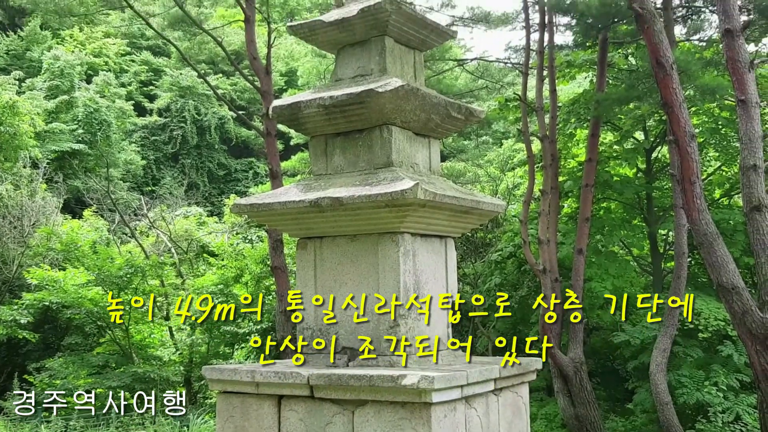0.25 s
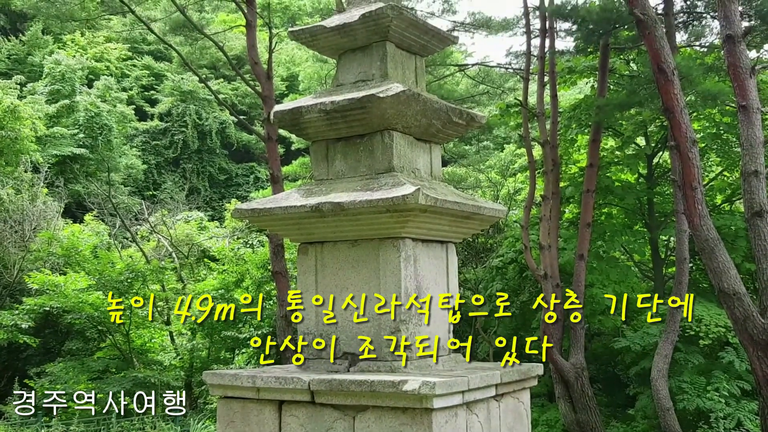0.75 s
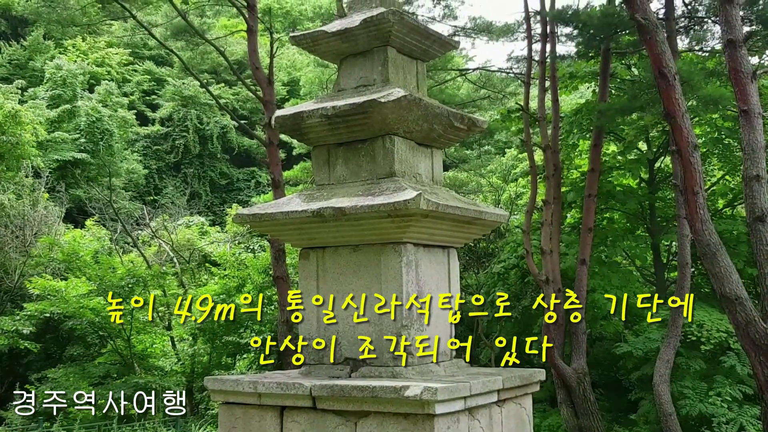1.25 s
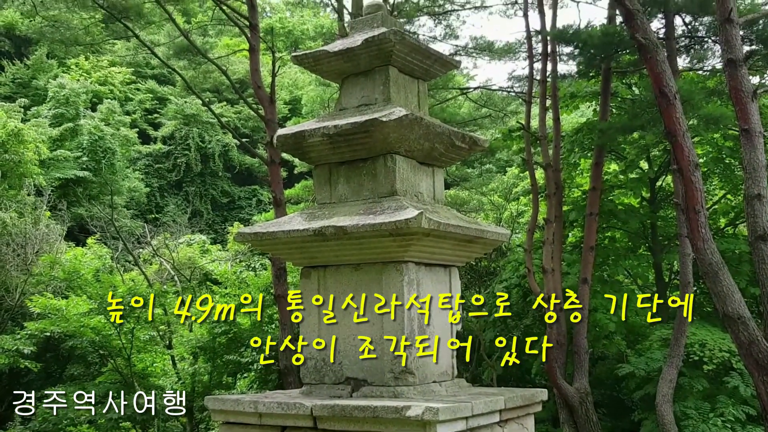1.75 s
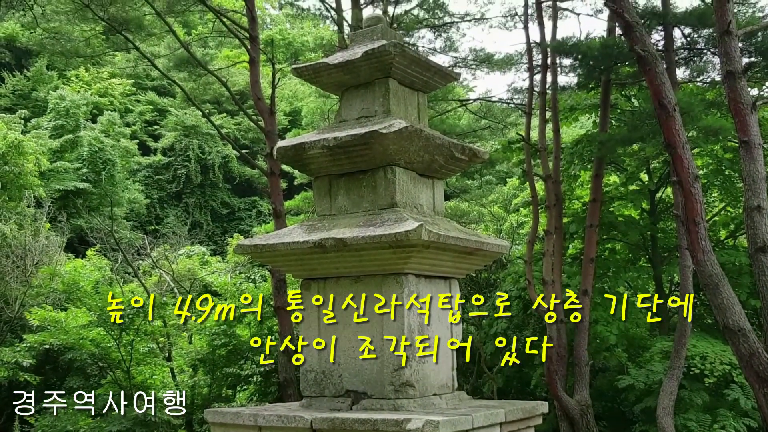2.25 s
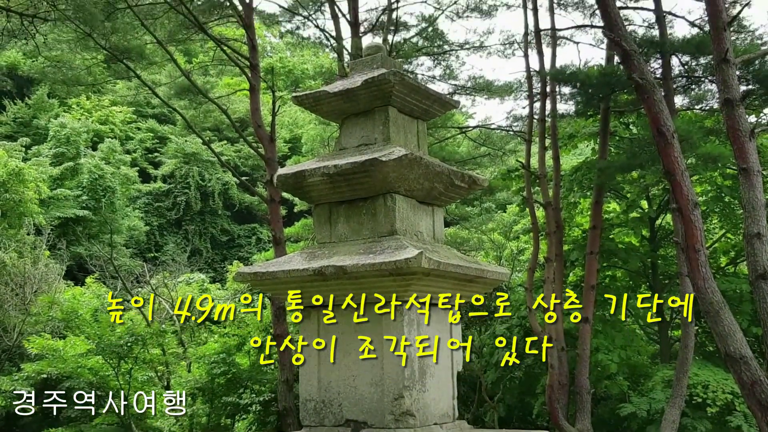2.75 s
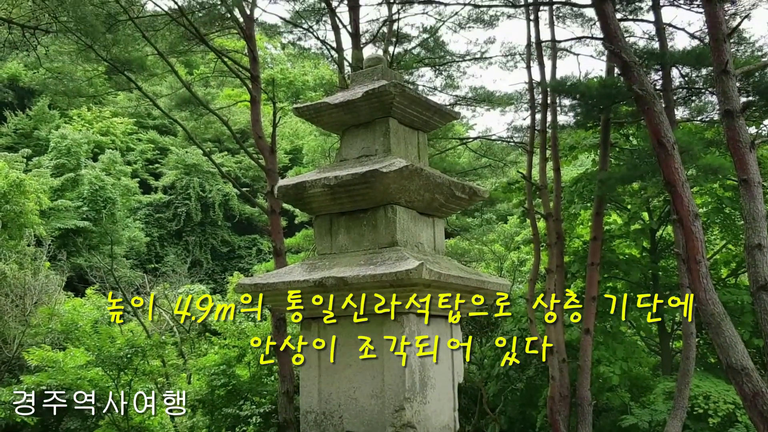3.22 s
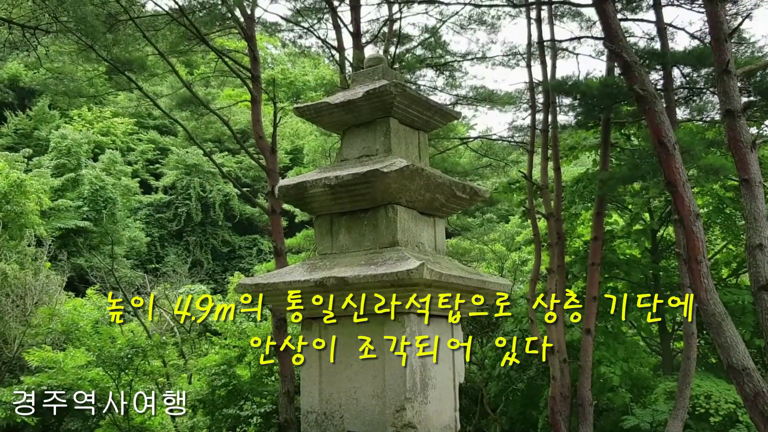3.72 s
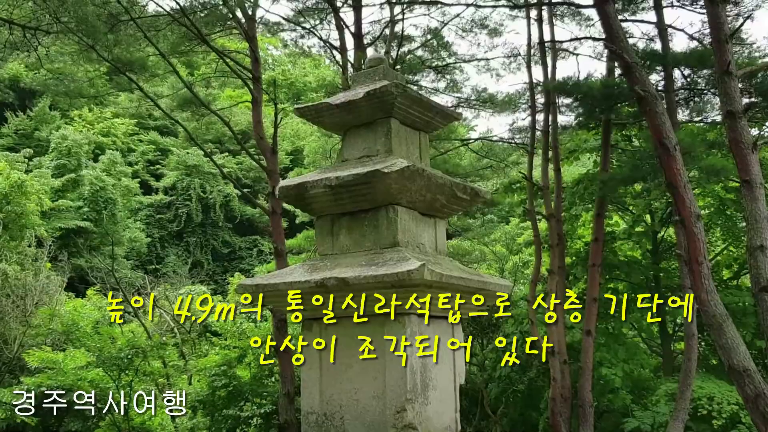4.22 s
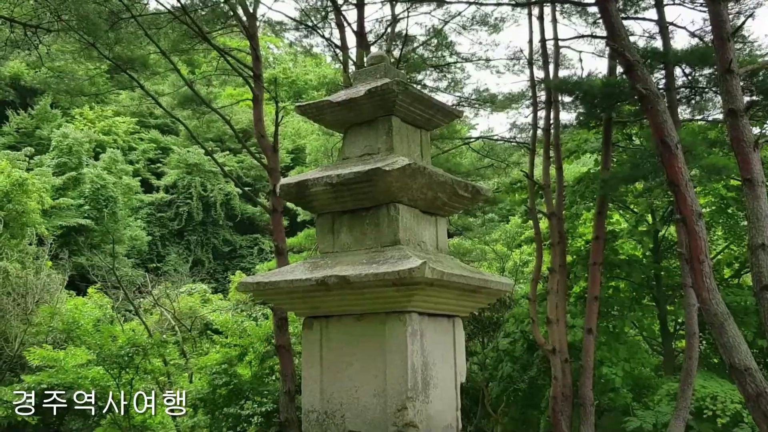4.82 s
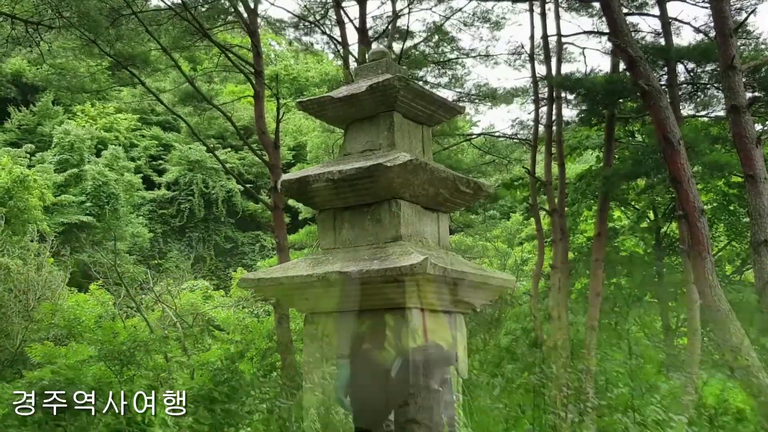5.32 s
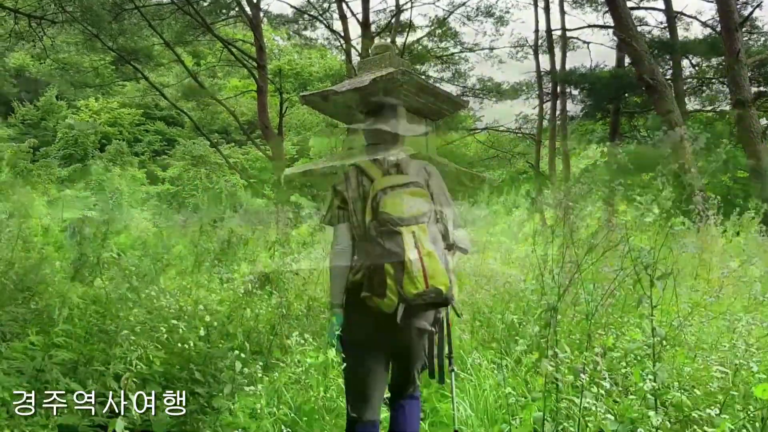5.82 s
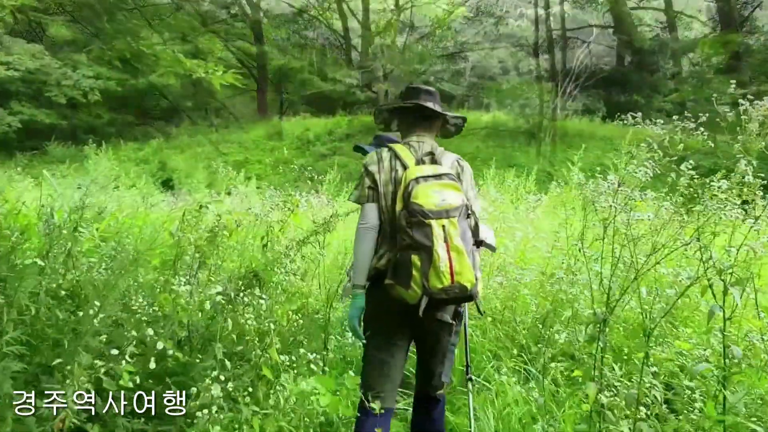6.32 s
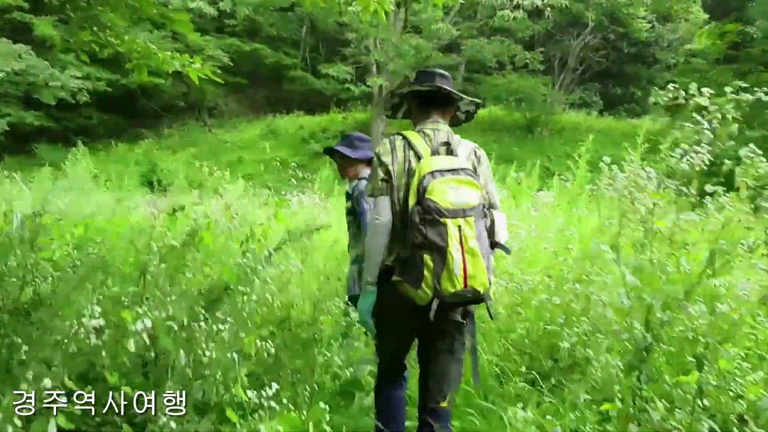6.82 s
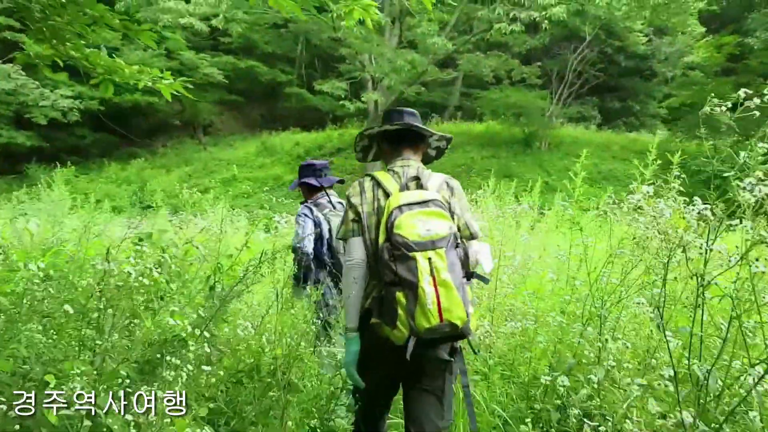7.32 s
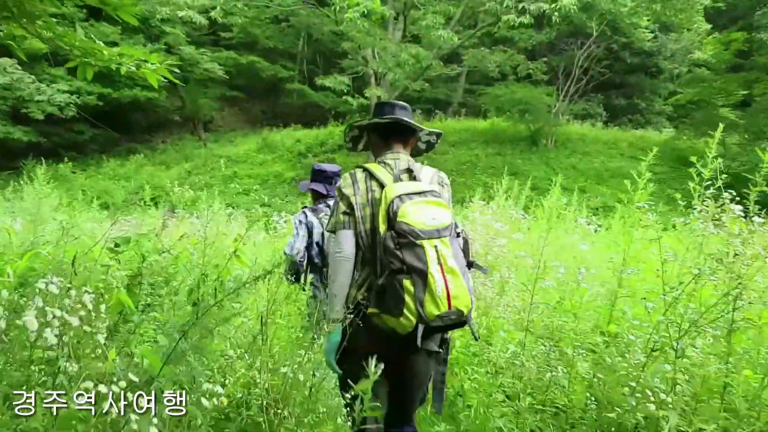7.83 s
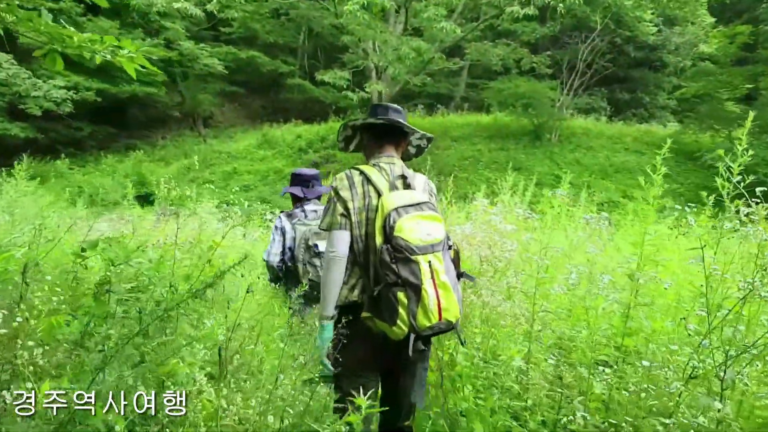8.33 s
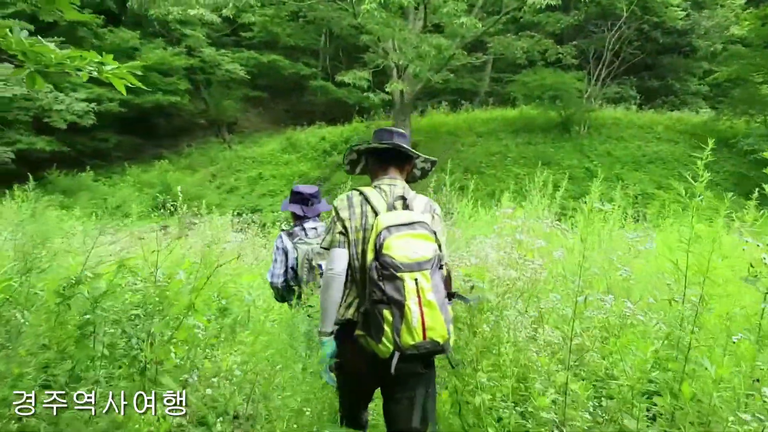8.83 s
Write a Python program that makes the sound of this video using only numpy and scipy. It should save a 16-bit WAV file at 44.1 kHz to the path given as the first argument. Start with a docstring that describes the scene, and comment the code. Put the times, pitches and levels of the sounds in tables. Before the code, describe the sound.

Cicadas drone steadily in a high, hissing chorus at a forest edge, with one soft knock and a little wind on the microphone.

```python
"""Cicadas at a summer forest edge.

A far chorus drones while nearer singers swell and fade in phrases. Each clicks its tymbals, a periodic
drive whose overtones are shaped by the resonance of its belly. Wind rumbles in the two microphones of
a hand-held camera, cloth rustles, and the camera body creaks and gives one soft knock. Faint buzzes
sound far off. Early on, the sound drops out for a moment and returns from another spot."""
import sys
import numpy as np
from scipy import signal
from scipy.fft import rfft, irfft
from scipy.io import wavfile
from scipy.ndimage import uniform_filter1d

SR = 44100
rng = np.random.default_rng(int(sys.argv[2]) if len(sys.argv) > 2 else 0)


def log_audio(samples):
    """Write samples as a 16-bit WAV file to the path given in sys.argv[1]."""
    # one column per channel
    frames = np.atleast_2d(samples).T
    # limit to full scale, then quantise
    limited = np.clip(frames, -1, 1)
    pcm = np.round(limited * 32767).astype(np.int16)
    wavfile.write(sys.argv[1], SR, pcm)


N = 399546
GAP_S = .7965, .858  # start and end of the drop-out


def undb(db):
    """Amplitude grows tenfold for every 20 dB."""
    return 10 ** (np.asarray(db) / 20)

def unit(x):
    """Normalisation to rms 1 in each channel."""
    return x / np.sqrt(np.mean(x ** 2, axis=-1, keepdims=True))

def walk(rate, channels=1):
    """Slow random fluctuation of rms 1: values held for 1 / rate seconds and smoothed twice."""
    hold = int(SR / rate)
    steps = np.repeat(rng.standard_normal((channels, N // hold + 1)), hold, axis=1)
    return unit(uniform_filter1d(uniform_filter1d(steps, hold), hold)[:, :N])

def curve(table):
    """Linear interpolation of each column over the times in the first."""
    times, *columns = np.vstack(table).T
    return [np.interp(np.arange(N) / SR, times, column) for column in columns]

def phrases(rows):
    """Half-sine swells that add in power."""
    t = np.arange(N) / SR
    return np.sqrt(sum((undb(db) * np.cos(np.pi * np.clip((t - middle) / length, -.5, .5))) ** 2
                       for middle, length, db, *_ in rows))

def resonance(hz, modes):
    """Gain at hz of steep resonances that add in power."""
    return np.sqrt(sum(undb(db) ** 2 / (1 + (2 * (hz - f) / width) ** 2) ** 2 for f, width, db in modes))

def slope(colour):
    """Spectral envelope: gain as a function of frequency, interpolated in dB over log frequency."""
    hz, db = np.transpose(colour)
    return lambda f: undb(np.interp(np.log(f), np.log(hz), db))

def noise(gain, alike=0.):
    """Partly coherent noise shaped by gain(Hz); both microphones share the fraction alike of its power."""
    white = rng.standard_normal((3, N))
    pair = np.sqrt(alike) * white[0] + np.sqrt(1 - alike) * white[1:]
    return unit(irfft(rfft(pair) * gain(np.fft.rfftfreq(N, 1 / SR) + 1), N))

def place(pair, levels, swells=0., sway_db=1.4):
    """Level difference gives direction: the balance (left minus right) sways; swells add in power."""
    db, balance_db = curve(levels)
    side = undb((balance_db + sway_db * walk(6.)[0]) * np.array([[.5], [-.5]]))
    return pair * side * np.hypot(undb(db), swells) * 2 / np.sqrt(np.sum(side ** 2, axis=0))

def tymbal_song(click_hz, belly, clear, wander, flicker_db, flicker_rate):
    """Periodic clicks form a harmonic comb; tree echoes blur all but the share clear into noise."""
    phase = 2 * np.pi * np.cumsum(click_hz * (1 + wander * walk(4.)[0])) / SR
    centres = np.array(belly)[:, 0]
    comb = 0
    for k in range(int(centres.min() / click_hz) - 3, int(centres.max() / click_hz) + 4):
        # each overtone reaches each microphone by its own changing paths
        paths = undb(flicker_db * np.clip(walk(flicker_rate, channels=2), -3, 1.6))
        overtone = np.cos(k * phase + 2 * np.pi * rng.random((2, 1)))
        comb = comb + resonance(k * click_hz, belly) * paths * overtone
    return np.sqrt(clear) * unit(comb) + np.sqrt(1 - clear) * noise(lambda f: resonance(f, belly))


# Belly resonances of the chorus's two bands. Each row: centre in Hz, width in Hz, gain in dB.
FAR_BELLY = [(7510, 800, 0), (8090, 940, 2)]
FAR_TOP_BELLY = [(8710, 790, 4), (9224, 220, 4.5), (9660, 1130, -3.5)]
# Their loudness, before and after the drop-out. Each row: time in seconds, level in dB, balance in dB.
FAR_LEVELS = [
    [(0.0, -40, 11), (0.79, -39, 11)],
    [(0.86, -40.5, 7), (2.0, -41, 6.5), (3.3, -40.5, 4), (4.1, -41.5, 5), (5.3, -41, 4), (7.18, -40.5, 7),
     (9.06, -39.5, 4.5)],
]
FAR_TOP_LEVELS = [
    [(0.0, -36.5, 14), (0.79, -36.5, 7)],
    [(0.86, -44.5, 9.0), (1.32, -47.5, 9.8), (3.49, -43, 5.5), (5.11, -44, 7.2), (6.75, -44, 7.5),
     (7.5, -47, 19), (8.37, -42.5, 5.9), (9.06, -45.5, 5.8)],
]

def far_chorus():
    """Scattering by trees smears distant cicadas into two bands of steady hiss."""
    main = tymbal_song(393., FAR_BELLY, clear=.13, wander=.003, flicker_db=5.5, flicker_rate=35.)
    main = place(main, FAR_LEVELS)
    top = tymbal_song(394., FAR_TOP_BELLY, clear=.13, wander=.004, flicker_db=6., flicker_rate=25.)
    return main + place(top, FAR_TOP_LEVELS)


# Belly resonances of the low singers. Each row: centre in Hz, width in Hz, gain in dB.
LOW_MODES = [(3606, 830, 0.15), (4364, 1780, 2.9)]
# Their drone between phrases. Each row: time in seconds, level in dB, balance in dB.
LOW_LEVELS = [
    [(0.0, -52, -0.5), (0.79, -51, -5)],
    [(0.86, -52.5, -0.21), (2.5, -51, -0.43), (4.45, -58.5, -0.71), (5.8, -46, 0.33), (7.4, -53.5, 0.56),
     (8.3, -51, -0.12), (9.06, -49.5, -2.2)],
]
# Their phrases. Each row: middle and length in seconds, peak in dB, click rate in Hz,
# clearest tone in Hz, its level in dB before the belly's gain.
LOW_SWELLS = [(0.555, 0.28, -55, 382, 4180, -48), (1.174, 0.22, -50, 370, 4450, -65),
              (1.436, .25, -65, 387, 4290, -54), (1.79, 0.46, -56, 377, 4420, -50),
              (2.33, 0.42, -67, 360, 4400, -46.5), (2.774, 0.86, -55.5, 365, 4450, -42),
              (3.032, 0.44, -58, 400, 4270, -45), (3.231, 0.33, -52, 370, 4500, -45.5),
              (3.462, 0.22, -49.5, 389, 3520, -45.5), (3.692, 0.45, -52.5, 372, 3840, -46),
              (3.903, 0.35, -55, 378, 4290, -45.5), (4.114, 0.52, -50, 365, 4480, -42.5),
              (4.317, .24, -50, 390.5, 4070, -40), (4.56, 0.21, -52, 359, 4670, -47),
              (4.749, 0.37, -45, 375, 3930, -53), (5.145, 0.61, -50, 392, 4340, -42),
              (5.571, 0.25, -64, 389, 4300, -43), (5.66, 0.15, -61, 394, 4600, -57),
              (5.97, 0.2, -60, 389, 4310, -40), (6.364, 0.32, -55, 392, 4250, -46),
              (6.778, 0.37, -56.5, 392, 4320, -42.5), (7.221, 0.43, -49, 390, 4200, -41),
              (7.633, 0.44, -48, 389, 4300, -43), (8.088, 0.52, -47, 384, 3800, -44),
              (8.434, 0.26, -62, 393, 4730, -45), (8.58, 0.44, -48.5, 376, 4100, -43.5),
              (8.865, 0.13, -57, 392, 4700, -44), (9.043, 0.17, -45.5, 383, 4160, -63)]

def low_singers():
    """Superposition of two cicadas with different click rates makes one rough, swelling song."""
    pair = sum(tymbal_song(click_hz, LOW_MODES, clear=.22, wander=.006, flicker_db=5., flicker_rate=16.)
               for click_hz in (391., 371.)) / np.sqrt(2)
    return place(pair * undb(1.2 * walk(40.)), LOW_LEVELS, phrases(LOW_SWELLS)) + ringing_overtones()

def ringing_overtones(ring_s=.15, slip_s=.07, step_db=4.5, scatter_db=5.):
    """Harmonics ring in each low phrase, weaker and looser in time the farther from its clearest tone."""
    out, t = np.zeros((2, N + 2 * SR)), np.arange(int(ring_s * SR)) / SR
    harmonics = range(9, 14)
    chance = rng.random((len(LOW_SWELLS), len(harmonics), 3, 2, 1))
    rasp = .2 * np.tile(walk(110., channels=2), 2)  # phase jitter in turns
    for (middle, _, _, click_hz, clear_hz, db), draws in zip(LOW_SWELLS, chance):
        for k, (turn, loss, slip) in zip(harmonics, draws):
            steps = abs(k - clear_hz / click_hz)
            at = int((middle - ring_s / 2 + slip_s * steps * (2 * slip[0, 0] - 1)) * SR)
            gain = undb(db - step_db * steps - scatter_db * loss) * resonance(k * click_hz, LOW_MODES)
            tone = np.cos(2 * np.pi * (k * click_hz * t + rasp[:, at:at + len(t)] + turn))
            out[:, at:at + len(t)] += gain * tone * np.sqrt(np.hanning(len(t)))
    return out[:, :N] * undb(3.5 * walk(32., channels=2))


# Belly resonances of the middle singer. Each row: centre in Hz, width in Hz, gain in dB.
MID_MODES = [(5967, 39, 9), (6380, 1030, -0.5)]
# Its glide. Each row: time in seconds, pitch in Hz; at the last row's pitch the song is unshifted.
MID_GLIDE = [(0, 6400), (2.0, 6340), (2.8, 6830), (4.4, 6545), (5.6, 6225), (7.7, 6194), (9.06, 6030)]
# Its loudness. Each row: time in seconds, level in dB, balance in dB.
MID_LEVELS = [
    [(0.0, -48.5, 2.8), (0.79, -46, 2.6)],
    [(0.86, -48, -6), (2.19, -58.5, -21), (3.31, -51, -7), (4.08, -49, -7), (6.34, -45.5, -8),
     (7.6, -46.5, -4), (7.74, -62, -15), (8.69, -61.5, -13), (9.06, -59, -9)],
]

def middle_singer():
    """A frequency shift moves every overtone by the same amount, so the whole song glides."""
    song = tymbal_song(203.3, MID_MODES, clear=.15, wander=.002, flicker_db=5., flicker_rate=14.)
    shift_hz = curve(MID_GLIDE)[0] - MID_GLIDE[-1][1]
    gliding = np.real(signal.hilbert(song) * np.exp(2j * np.pi * np.cumsum(shift_hz) / SR))
    return place(gliding, MID_LEVELS)


# Belly resonances of the high singer. Each row: centre in Hz, width in Hz, gain in dB.
HIGH_MODES = [(12550, 1500, -2), (13300, 680, 1), (13980, 2300, 1), (12600, 2400, -1.3)]
# Its clarity. Each row: time in seconds, share of the power in steady clicks from 0 to 1.
HIGH_CLARITY = [(0, .05), (3.0, .2), (5.5, .3), (6.1, .55), (7.5, .55), (8.0, .25), (9.06, .1)]
# Its drone between phrases. Each row: time in seconds, level in dB, balance in dB.
HIGH_LEVELS = [
    [(0.0, -58, 6.9), (0.79, -57, 14)],
    [(0.86, -55.5, 1.7), (1.89, -55.5, 8.6), (3.1, -54, 8), (5.3, -51.5, 7.3), (6.4, -54, 9.6),
     (7.6, -53, 9.1), (8.5, -53, 5.4), (9.06, -50, 7.7)],
]
# Its phrases. Each row: middle in seconds, length in seconds, peak in dB.
HIGH_SWELLS = [(2.65, .3, -60), (3.07, .3, -55), (3.46, 0.33, -50), (3.94, 0.44, -50), (4.36, 0.46, -51),
               (4.87, 0.51, -49), (5.37, 0.45, -47), (5.77, 0.47, -47.5), (6.15, 0.48, -46.5),
               (6.59, 0.39, -46.5), (7.0, 0.4, -46.5), (7.41, 0.46, -47.5), (7.81, 0.51, -48.5),
               (8.34, 0.27, -56)]

def high_singer():
    """Belly resonance near 13 kHz selects high harmonics of the clicks: a thin, pulsing sizzle."""
    clear = curve(HIGH_CLARITY)[0]
    song = tymbal_song(194.2, HIGH_MODES, clear, wander=.0013, flicker_db=5.5, flicker_rate=11.)
    return place(song, HIGH_LEVELS, phrases(HIGH_SWELLS))


# Spectrum of the background hiss. Each row: frequency in Hz, gain in dB.
HISS_COLOUR = [(710, -75), (1200, -88), (1770, -24.5), (3060, -9), (3960, -18.5), (4460, -21), (5650, -15),
               (7240, 0), (7800, -1), (8690, -10.5), (10900, -9), (13700, -21), (15700, -14.5)]
# Its loudness. Each row: time in seconds, level in dB, balance in dB.
HISS_LEVELS = [
    [(0, -49, -2), (.79, -48, -2)],
    [(.865, -50.5, -1), (3, -46, -0.5), (6, -45, -0.5), (9.06, -46, -1.5)],
]

def forest_hiss():
    """Treble noise, incoherent between the microphones, is heard as a diffuse field."""
    return place(noise(slope(HISS_COLOUR)), HISS_LEVELS)


# Resonances of the microphone ports. Each row: centre in Hz, width in Hz, gain in dB.
PORT_MODES = [(67.8, 30, 27), (45, 40, -17)]
# Wind between gusts. Each row: time in seconds, level in dB, balance in dB.
WIND_LEVELS = [
    [(0, -51, 7.1), (.6, -48.5, 8.7), (.79, -43, 3)],
    [(.87, -63, -1), (2.1, -65, -4), (3.6, -62, 0.5), (5.3, -62.5, -2), (5.9, -72, -3), (7.2, -59.5, -1),
     (9.06, -68.5, 1)],
]
# Gusts. Each row: middle in seconds, length in seconds, peak in dB.
WIND_GUSTS = [(0.07, 0.14, -39.5), (0.27, 0.063, -38), (0.54, 0.24, -40), (1.1, 0.17, -58),
              (1.62, 0.11, -54), (2.85, 0.12, -65), (3.34, 0.067, -54), (3.8, 0.41, -54.5),
              (4.42, 0.16, -53.5), (4.59, 0.12, -55.5), (4.97, 0.2, -53.5), (5.5, 0.12, -54),
              (6.52, 0.087, -57), (6.95, 0.76, -61), (7.65, 0.22, -59), (8.21, 0.087, -57.5),
              (8.8, 0.35, -58)]

def wind():
    """Turbulence drives a low, fluttering boom in the microphone ports."""
    boom = noise(lambda f: resonance(f, PORT_MODES), alike=.3) * undb(1.2 * walk(12., channels=2))
    flutter = undb(1.3 * walk(12.))
    return place(boom * flutter, WIND_LEVELS, phrases(WIND_GUSTS))


# Spectrum of the rustle. Each row: frequency in Hz, relative spectral density in dB.
RUSTLE_SPECTRUM = [(60, -25.5), (110, 8.5), (200, 0), (400, -6.5), (550, -3), (1000, -10), (1800, -3),
                   (3000, -9)]
# Rustle between brushes. Each row: time in seconds, level in dB, balance in dB.
RUSTLE_LEVELS = [
    [(0.0, -56, 2), (0.442, -54, 1.3), (0.79, -55.5, 1.8)],
    [(0.86, -65.5, 0.093), (2.2, -73, 0.2), (3.3, -69.5, 0.17), (4.36, -66, 0.64), (5.4, -68, 0.9),
     (6.5, -72, 1), (8.0, -71.5, 0), (9.06, -74.5, 0.19)],
]
# Brushes of cloth or grass. Each row: middle in seconds, length in seconds, peak in dB.
BRUSHES = [(0.27, .06, -58), (0.33, 0.17, -55.5), (1.17, 0.091, -68), (1.6, 0.21, -60), (1.96, 0.12, -61.5),
           (2.355, 0.062, -59.5), (2.7, 0.75, -63), (3.14, 0.08, -61.5), (3.45, 0.6, -62),
           (3.87, 0.44, -56), (3.855, .05, -52), (3.93, 0.079, -51), (4.18, 0.25, -62.5),
           (4.62, 0.17, -60.5), (5.3, 0.14, -65.5), (5.65, 0.19, -65), (6.13, 0.29, -65), (6.66, 0.3, -70),
           (6.9, 0.14, -68), (7.2, 0.26, -76), (7.57, 0.26, -64.5), (8.2, 0.18, -65.5), (8.32, 0.22, -65.5),
           (8.6, 0.41, -63.5), (8.62, 0.048, -63), (8.93, 0.39, -63.5)]

def rustle():
    """Friction of hands and clothes makes noise whose bands fluctuate partly together, partly alone."""
    together, colour, bands = walk(9.2), slope(RUSTLE_SPECTRUM), 0
    for hz in 110 * 2 ** np.arange(0, 4.6, .75):
        band = noise(lambda f: resonance(f, [(hz, hz * .6, 0)]), alike=.55)
        bands = bands + band * colour(hz) * np.sqrt(hz) * undb(1.5 * together + 2.6 * walk(12.))
    return place(unit(bands), RUSTLE_LEVELS, phrases(BRUSHES))


# Modes of the camera body. Each row: frequency in Hz, gain in dB, time to decay by 60 dB in seconds.
BODY_MODES = [(222, 4, 0.022), (357, -10, 0.021), (455, -10.5, 0.0083), (567, -9, 0.016), (658, 5.5, 0.03),
              (850, 0, 0.018), (865, -10, 0.011), (1150, 2.5, 0.022), (1350, 4, 0.0086),
              (1690, 10.5, 0.016), (2070, 9.5, 0.024), (2660, 1, 0.013)]
# Its creaks and knocks. Each row: start in seconds, peak in dB, favoured pitch in Hz, balance in dB,
# time constant of the contact in seconds.
BODY_SLIPS = [(0.27, -37, 244, 2, .006), (0.29, -24.5, 522, 3, 0.0026), (0.305, -39, 610, 1, 0.0035),
              (0.322, -30.5, 553, 4, 0.0024), (0.341, -37, 560, 4, 0.0033),
              (0.288, -40.5, 2540, 16, 0.0041), (0.312, -39, 2640, 10, 0.0022),
              (1.589, -47.5, 248, -20, 0.0013), (1.619, -54, 253, -13, 0.0043),
              (2.349, -59, 1200, 0, 0.0024), (2.659, -57, 667, 6, 0.018), (3.129, -46.5, 790, 2, 0.0061),
              (3.409, -48, 1500, 6, 0.0083), (3.437, -48, 653, -5, 0.0015), (3.601, -52, 595, 1, 0.0025),
              (3.663, -48, 1320, 8, 0.0051), (3.72, -45.5, 1340, 0.0, 0.0026),
              (3.759, -50, 1270, 3, 0.0021), (3.803, -33, 1224, 0, 0.0016), (3.814, -32, 1207, 6, 0.0016),
              (3.827, -39, 1600, 3, 0.0015), (3.835, -27.5, 440, 3.5, 0.00089),
              (3.865, -30.5, 1340, 6, 0.0027), (3.892, -36, 1350, 4, 0.0022), (3.904, -26, 1264, 2, 0.0077),
              (3.911, -23, 1230, 1, 0.00068), (3.914, -17, 744, 1, 0.00087), (4.15, -55, 640, 4, 0.0034),
              (4.584, -46, 516, -2, 0.0049), (5.269, -53, 600, 5, 0.0075), (6.106, -56, 1130, 0, 0.0037),
              (6.202, -59, 600, 6, .004), (7.121, -51, 577, 2, 0.0065), (7.536, -49, 1300, 7, 0.0033),
              (7.594, -45, 361, 3, 0.0044), (8.175, -53, 563, 3, 0.0055), (8.202, -62, 557, 3, 0.0027),
              (8.3, -61, 646, -3, 0.0047), (8.322, -46, 2360, 3, 0.001), (8.611, -43, 1160, -4, 0.0024),
              (8.612, -49, 372, 8, 0.0036), (8.64, -49, 1370, -10, 0.002), (8.954, -53, 384, 4, 0.0076)]

def camera_knocks(roughness=3., alike=.92, db_per_octave=18.):
    """Modal excitation: each slip is a rough chatter that rings the modes near its favoured pitch."""
    out, t = np.zeros((2, N + SR)), np.arange(SR // 10) / SR
    white = rng.standard_normal((len(BODY_SLIPS), 3, len(t)))
    chatters = np.sqrt(alike) * white[:, :1] + np.sqrt(1 - alike) * white[:, 1:]
    for (start, db, hz, balance_db, contact_s), chatter in zip(BODY_SLIPS, chatters):
        age = t / max(contact_s, .001)
        contact = age ** .8 * np.exp(-age)  # a soft contact swells before it fades
        force = (np.sin(2 * np.pi * hz * t) + roughness * chatter) * contact
        body = sum(undb(gain_db - db_per_octave * abs(np.log2(f / hz)) - 60 * t / t60)
                   * np.sin(2 * np.pi * f * t) for f, gain_db, t60 in BODY_MODES)
        hit = signal.fftconvolve(force, body[None], axes=1)[:, :len(t)]
        at = int(start * SR)
        out[:, at:at + len(t)] += hit / np.abs(hit).max() * undb(db + balance_db * np.array([[.5], [-.5]]))
    return out[:, :N]


# Belly resonance of the fading singer. The row: centre in Hz, width in Hz, gain in dB.
FADING_MODES = [(5720, 1100, 0)]
# Its loudness. Each row: time in seconds, level in dB, balance in dB.
FADING_LEVELS = [
    [(0.865, -50.5, -4), (1.173, -48.5, -8), (2.589, -61, -3), (2.6, -63, -7)],
]

def fading_singer():
    """Noise under one belly resonance: a blurred song that enters at the drop-out and sinks away."""
    song = noise(lambda f: resonance(f, FADING_MODES))
    return place(song, FADING_LEVELS) * (np.arange(N) > GAP_S[0] * SR)


# Faint distant buzzes. Each row: middle in seconds, length in seconds, peak in dB, pitch in Hz.
FAR_BUZZES = [(2.74, 0.58, -70, 1276), (3.44, 0.27, -62, 400), (4.786, 0.54, -69.5, 1260),
              (8.914, 0.3, -71, 390)]

def far_buzzes(relative_width=.17, rough_db=3.):
    """Narrow-band noise has a pitch; fast amplitude modulation roughens it to a buzz."""
    out = 0
    for middle, length, db, hz in FAR_BUZZES:
        band = noise(lambda f: resonance(f, [(hz, relative_width * hz, 0)]), alike=.88)
        held = np.sqrt(phrases([(middle, length, 0)]))  # the root flattens the swell
        out = out + band * held * undb(db)
    return out * undb(rough_db * walk(35.))


def scene(small_body_hz=2200):
    """Superposition of all sources; moving air makes the treble flicker differently at each microphone."""
    songs = far_chorus() + low_singers() + middle_singer() + high_singer() + fading_singer()
    # so small a body radiates little at low frequencies
    songs = signal.sosfilt(signal.butter(4, small_body_hz, "high", fs=SR, output="sos"), songs)
    treble = songs + forest_hiss()
    flicker_db = np.array([[.8], [1.4]]) * walk(14., channels=2) + .6 * walk(12.)
    return treble * undb(flicker_db) + wind() + rustle() + camera_knocks() + far_buzzes()

def record(dry, cutoff_hz=15770):
    """A gate silences the sound briefly, and a steep low-pass filter removes the highest treble."""
    t = np.arange(N) / SR
    gate = np.clip(np.maximum((GAP_S[0] - t) / .002, (t - GAP_S[1]) / .008), 0, 1)
    return signal.sosfilt(signal.ellip(16, .3, 75, cutoff_hz, fs=SR, output="sos"), dry * gate)


dry = scene()
out = record(dry)
log_audio(out)
```